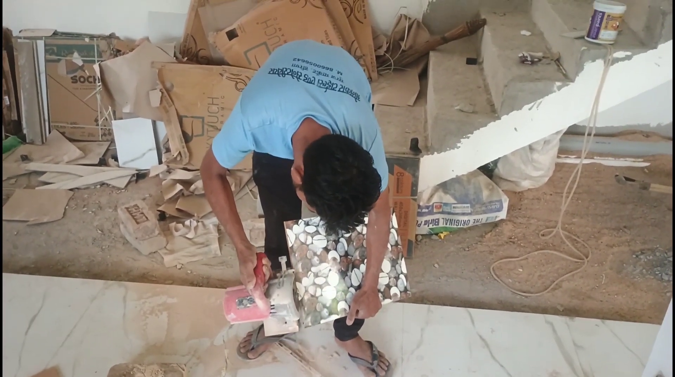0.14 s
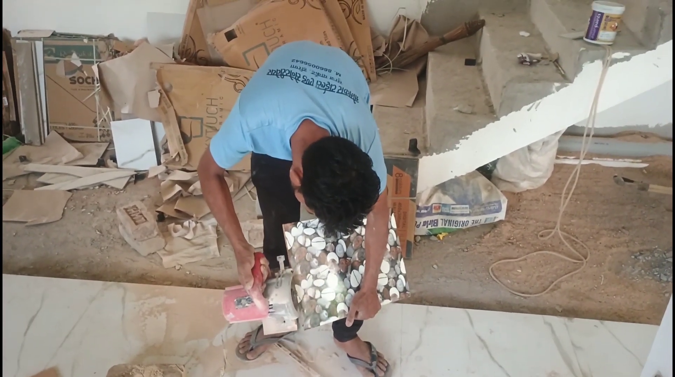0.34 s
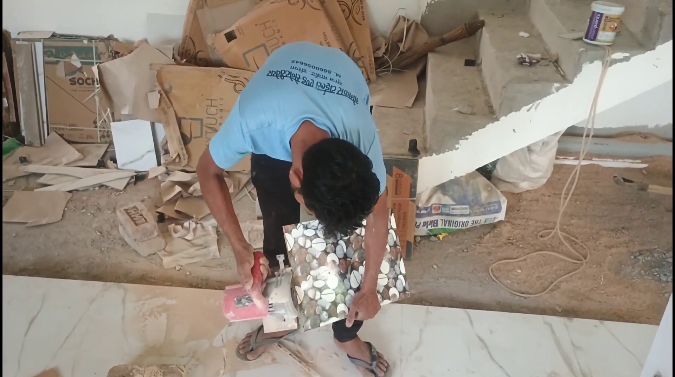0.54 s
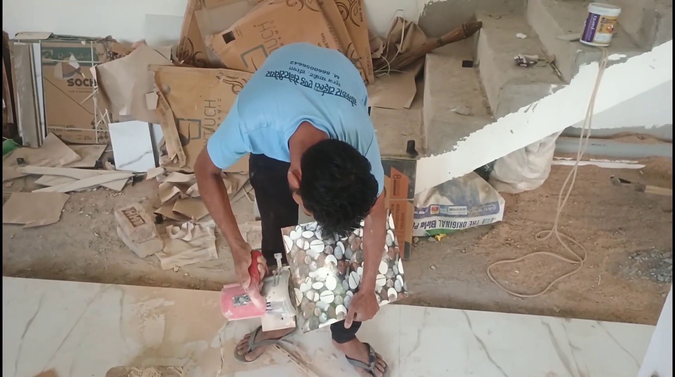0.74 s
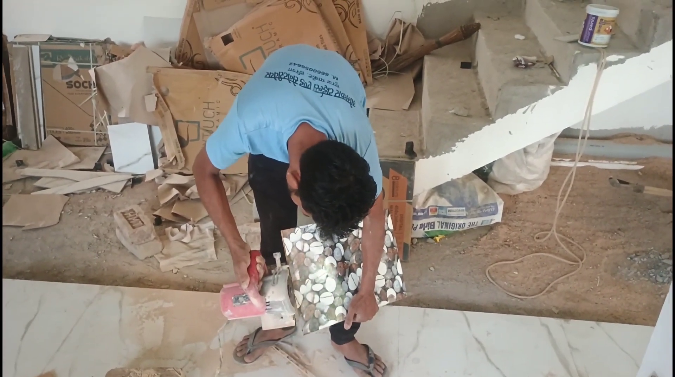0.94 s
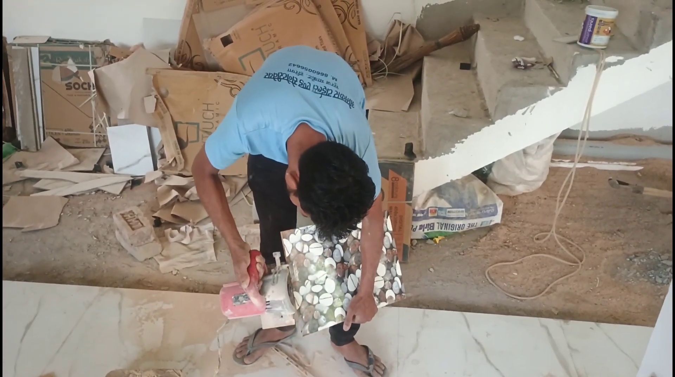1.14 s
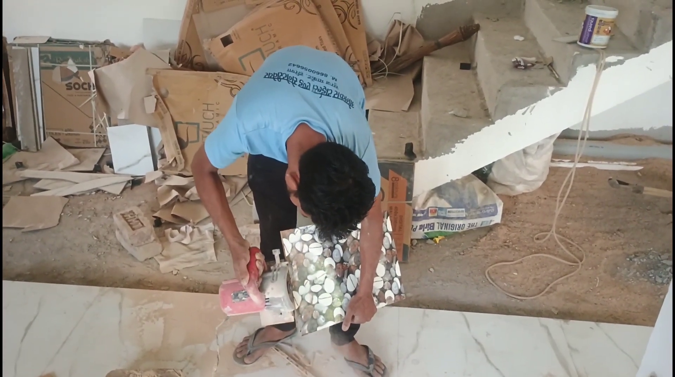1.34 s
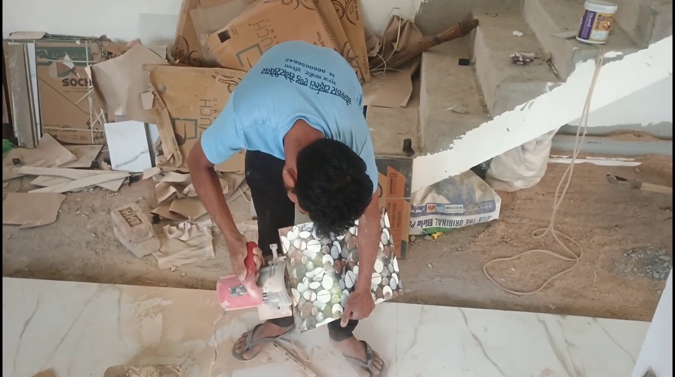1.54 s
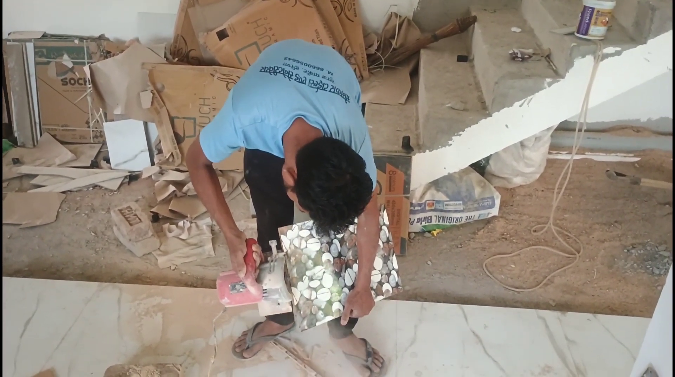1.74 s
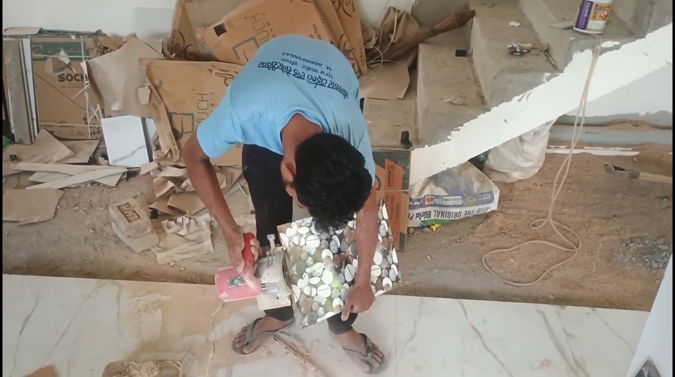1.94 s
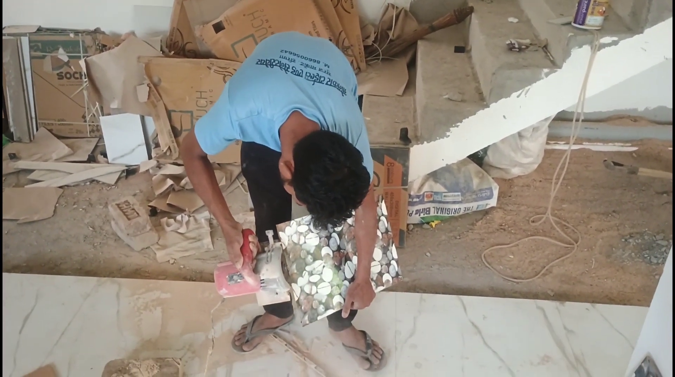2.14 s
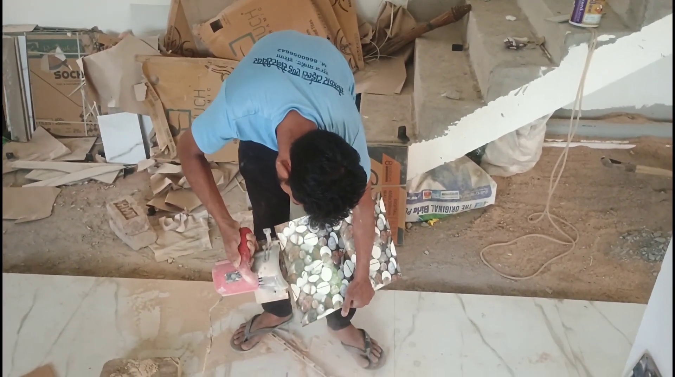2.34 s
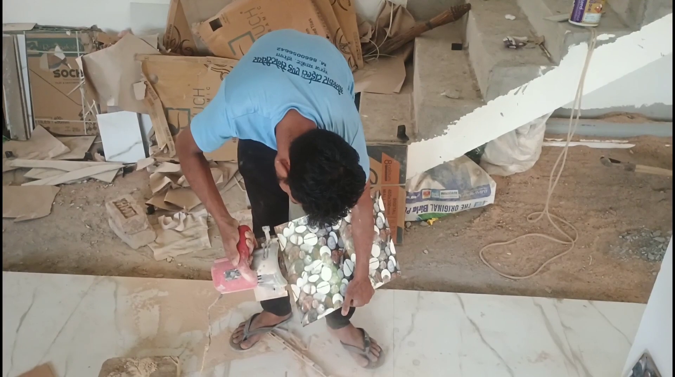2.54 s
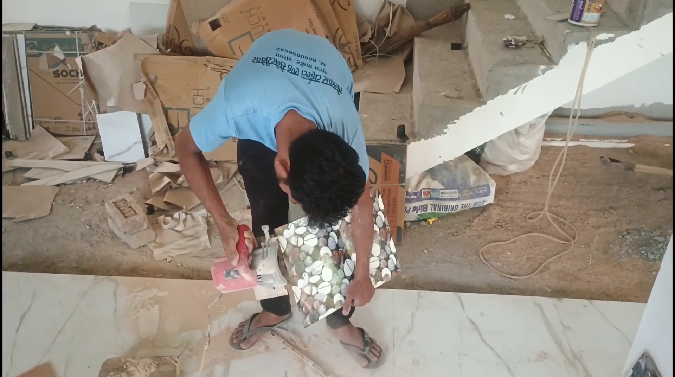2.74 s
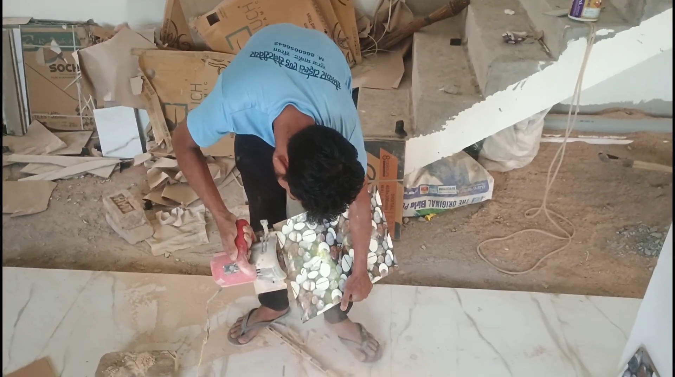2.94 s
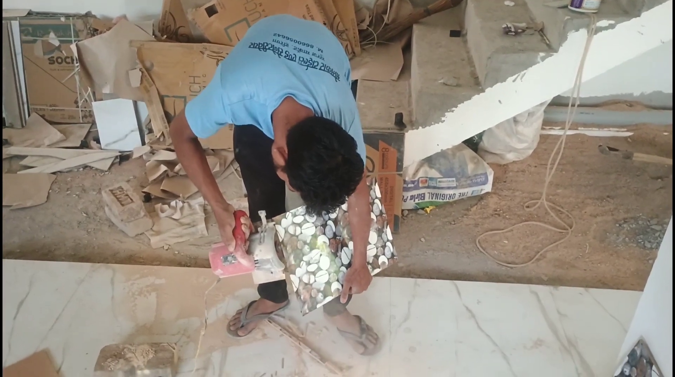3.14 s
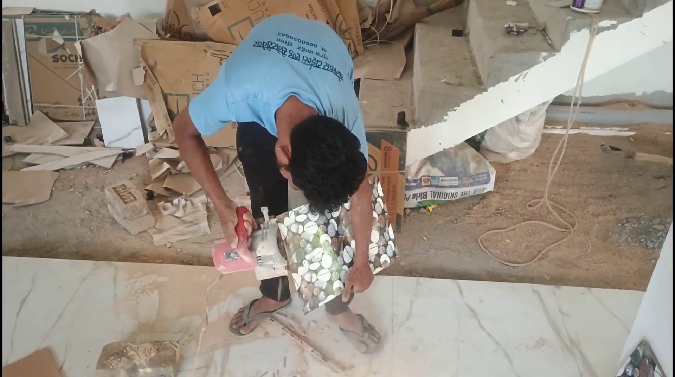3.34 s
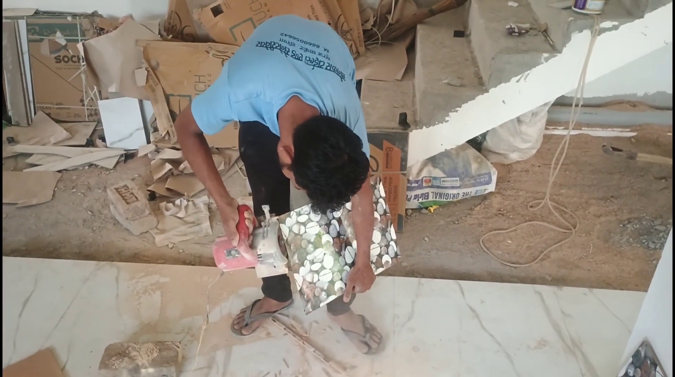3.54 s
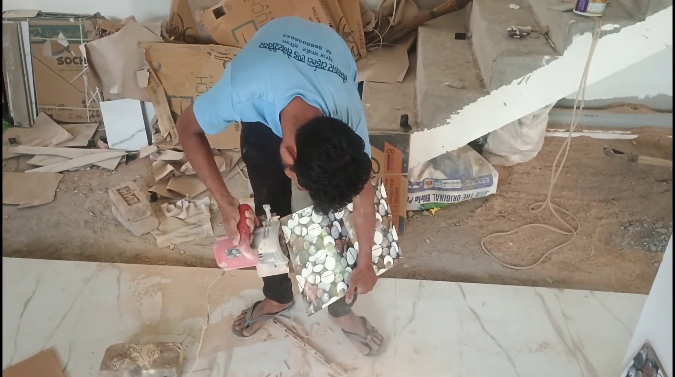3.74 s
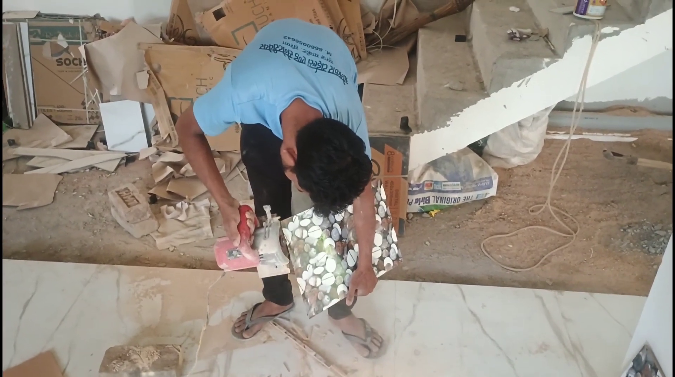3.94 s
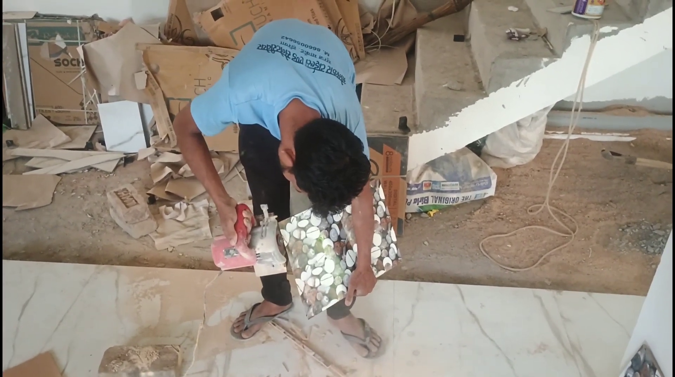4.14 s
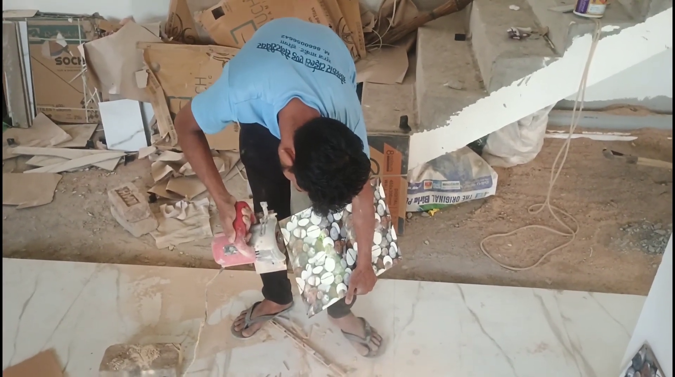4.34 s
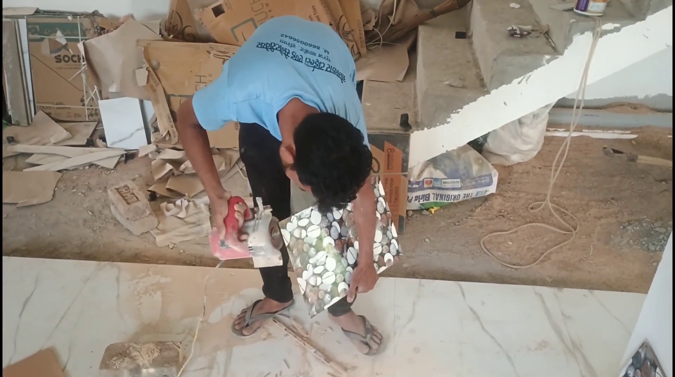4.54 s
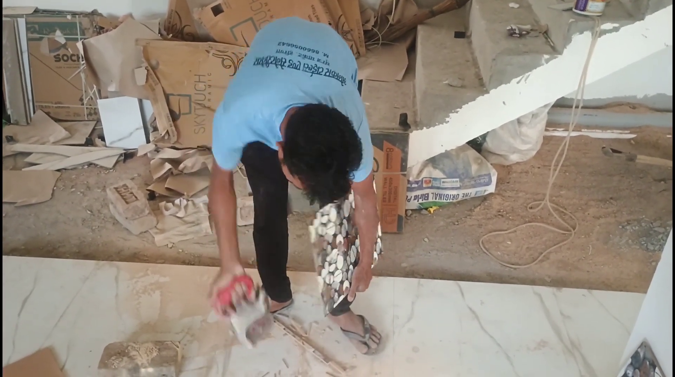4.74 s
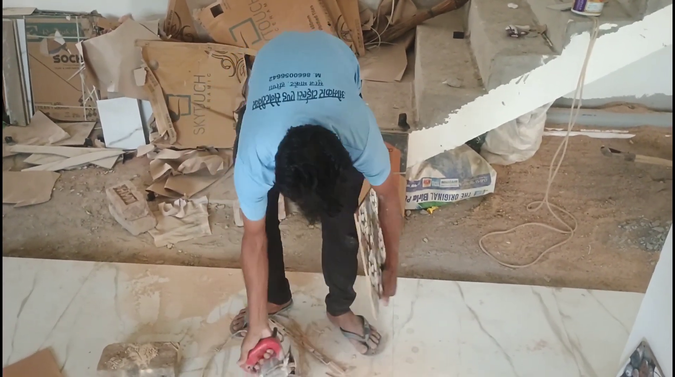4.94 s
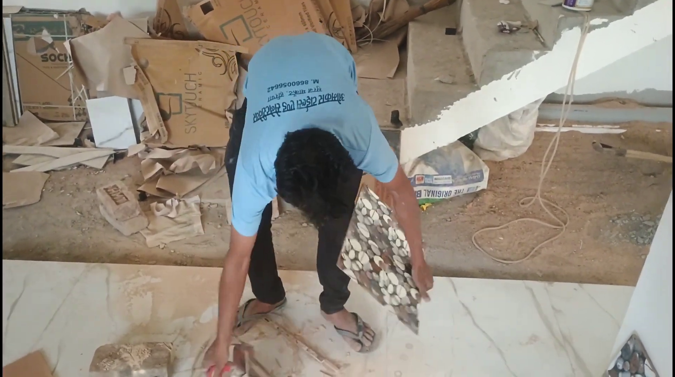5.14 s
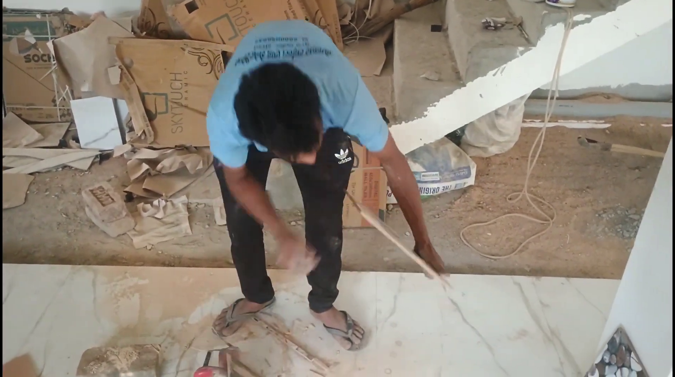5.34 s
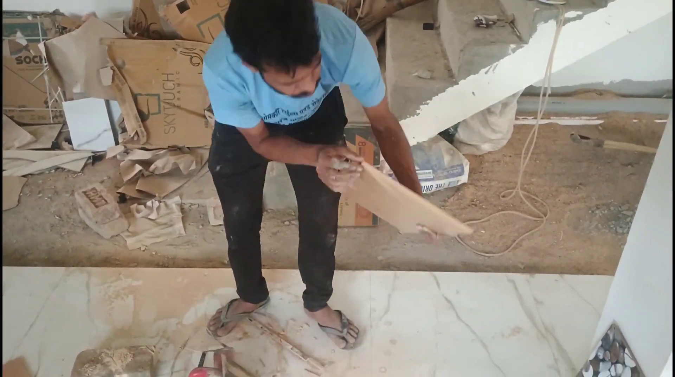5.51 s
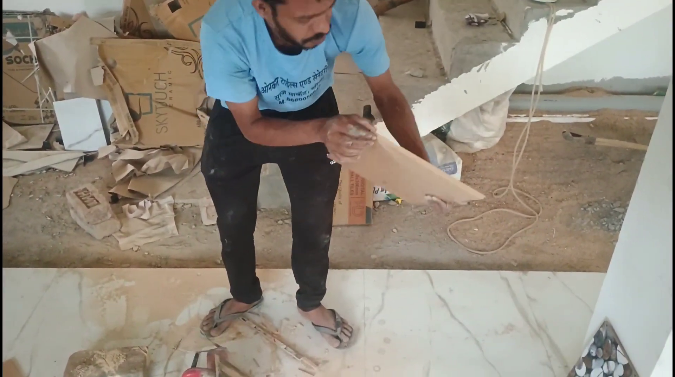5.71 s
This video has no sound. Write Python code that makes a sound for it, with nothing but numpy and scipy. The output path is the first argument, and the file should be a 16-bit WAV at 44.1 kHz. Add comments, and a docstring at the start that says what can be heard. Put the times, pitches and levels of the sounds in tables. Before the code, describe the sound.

Loud, bright tile grinding with a steady motor whine, then the freed blade coasts down, rushing and squealing, with small knocks on the floor.

```python
"""In a bare, hard room a handheld electric cutter grinds through a ceramic tile, is switched off and set down.
Random grit impacts ring resonances of blade and tile; sine tones for gears and rotor whine on top.
As the cutter coasts, the whine slides down while noise bands rush, scrape and squeal.
Decaying modes knock as the body meets the floor. Noise echoes make the room, and low noise lies beneath."""
import sys
import numpy as np
from scipy import signal
from scipy.fft import rfft, irfft, next_fast_len
from scipy.io import wavfile

SR = 44100
rng = np.random.default_rng(int(sys.argv[2]) if len(sys.argv) > 2 else 0)


def generate_wav(sig):
    """Save sig (samples, or channels by samples) to the path in sys.argv[1] as 16-bit PCM at SR."""
    pcm = np.round(np.clip(np.atleast_2d(sig).T, -1, 1) * 32767).astype(np.int16)
    wavfile.write(sys.argv[1], SR, pcm)


N = 258845
T = np.arange(N) / SR   # time in seconds
LOAD_OFF_S = 4.42       # the blade leaves the cut
SWITCH_OFF_S = 4.51
LEFT_RIGHT = np.array([[1], [-1]])


def amp(db):
    """Turns decibels into an amplitude factor."""
    return 10 ** (np.asarray(db) / 20)


def rms_one(x):
    """Scales a signal to an overall rms of 1."""
    return x / np.sqrt(np.mean(x ** 2) + 1e-20)


def in_time(rows):
    """Draws straight lines through time between the rows, one curve for each column after the seconds."""
    seconds, *columns = np.transpose(rows)
    return [np.interp(T, seconds, column) for column in columns]


def at_hz(points, hz):
    """Reads a curve over frequency, with straight lines on a logarithmic pitch scale."""
    points = np.array(points)
    return np.interp(np.log(hz + 1), np.log(points[:, 0]), points[:, 1])


def drift(rate_hz):
    """Slow random wandering with a spread of 1: smoothed noise made at every 40th sample."""
    step = 40
    r = np.exp(-2 * np.pi * step * rate_hz / SR)
    noise = rng.standard_normal(N // step + 2002)
    slow = signal.lfilter([1], [1, -2 * r, r * r], noise)[2000:]   # skip the filter's start
    return np.interp(np.arange(N) / step, np.arange(len(slow)), rms_one(slow))


def swell(at_s, lasts_s):
    """A flat-topped rise and fall that peaks at 1."""
    return np.exp(-((T - at_s) / lasts_s) ** 4)


def coloured(white, spectrum):
    """Filters white input to a given spectrum shape, then scales it to rms 1."""
    size = next_fast_len(N)
    gain = amp(at_hz(spectrum, np.fft.rfftfreq(size, 1 / SR)))
    return rms_one(irfft(rfft(white, size) * gain, size)[:N])


def resonance(x, hz, width_hz):
    """A two-pole filter that rings at one frequency; a narrower width rings longer."""
    r = np.exp(-np.pi * width_hz / SR)
    edge = (1 - r * r) / 2
    return signal.lfilter([edge, 0, -edge], [1, -2 * r * np.cos(2 * np.pi * hz / SR), r * r], x)


def narrow_noise(hz, width_hz):
    """A noise band with steep sides and rms 1: slow noise on a carrier whose pitch may glide."""
    r = np.exp(-np.pi * width_hz / SR)
    a, b = signal.lfilter([1], [1, -2 * r, r * r], rng.standard_normal((2, N)))
    phase = 2 * np.pi * np.cumsum(hz + np.zeros(N)) / SR
    return rms_one(a * np.cos(phase) + b * np.sin(phase))


# The cutting. Each row: time in seconds, level in dB, how far the ringing has shifted from 0 to 1.
GRINDING_LEVELS = [(0, -14.5, 0.45), (.3, -13.5, 0.56), (1.07, -13.5, 0.35), (1.5, -14, 0.39),
                   (2.1, -14, 0.76), (3.0, -14, 0.77), (4.41, -13.5, 0.83), (4.45, -15.5, 0.98),
                   (4.6, -17.5, 0.85), (4.8, -22.5, 0.8)]
# Colour of the grit impacts. Each row: frequency in Hz, relative level in dB per Hz.
GRIT_SPECTRUM = [(110, -70), (180, -40), (300, -30), (827, -17), (894, -15), (1090, -14.5), (1540, -17.5),
                 (2450, -11.5), (2650, -10.5), (3300, -6.5), (3750, -3.5), (4220, -0.5), (5130, -2),
                 (7710, -5.5), (10100, -3), (11400, -1.5), (15500, -7)]
# Ringing of blade and tile. Each row: frequency in Hz, width in Hz, gain in dB unshifted,
# gain in dB fully shifted.
BLADE_MODES = [(1710, 370, -5.5, 4), (2650, 100, -1.5, 2.5), (3080, 680, -43, 2.5), (4140, 270, -23, -6.5),
               (4630, 300, -2, -9), (5800, 590, -14, -9), (6900, 520, 12, -6), (7530, 230, -1, 4.5),
               (7900, 414, 1, 5.5), (9080, 370, 6.5, -2.5), (11390, 450, 2.5, -7.5), (11760, 45, -2, -15),
               (12000, 39, -1, -8), (13900, 98, 2, -10)]
RING_DAMPED_DB = -0.5   # the ringing drops once the load is off
WOBBLE_CUT = 0.023      # share by which the level swings once a blade turn


def grinding(wobble):
    """Dense grit impacts of uneven size ring the blade and tile; the ringing shifts as the cut advances."""
    level_db, shifted = in_time(GRINDING_LEVELS)
    shifted = np.clip(shifted, 0, 1)
    sizes = amp(3.36 * np.minimum(rng.exponential(1, N), 5)) * rng.choice([-1, 1], N)
    hits = rng.random(N) < .4   # chance of an impact at each sample
    grit = coloured(sizes * hits, GRIT_SPECTRUM)
    damped_db = RING_DAMPED_DB / (1 + np.exp((LOAD_OFF_S - T) / 0.034))
    out = grit.copy()
    for hz, width_hz, start_db, end_db in BLADE_MODES:
        gain_db = start_db + shifted * (end_db - start_db) + damped_db + 0.7 * drift(5.5)
        out += amp(gain_db) * resonance(grit, hz, width_hz)
    contact = 1 / (1 + np.exp((T - 4.7) / 0.067))   # fades out around 4.7 s
    return rms_one(out) * amp(level_db + 0.28 * drift(32)) * contact * (1 + WOBBLE_CUT * wobble)


# Speed under power, as the pitch of the gear whine. Each row: time in seconds, pitch in Hz.
POWERED_WHINE_PITCH = [(0, 894), (.5, 891.5), (1.25, 888), (1.65, 890), (1.95, 893), (2.15, 902),
                       (2.55, 897), (3.0, 899), (3.5, 903), (3.7, 911), (4.1, 914), (4.35, 917),
                       (4.51, 918)]
DRAG_S = 1.79


def speed():
    """Whine pitch through time in Hz; after switch-off, drag lowers it as 1 / (1 + time / DRAG_S) squared."""
    since_off = np.maximum(T - SWITCH_OFF_S, 0)
    return in_time(POWERED_WHINE_PITCH)[0] / (1 + since_off / DRAG_S) ** 2


def blade_wobble(whine_hz):
    """A sine swing once a blade turn, with twelve whine cycles to a turn."""
    return np.sin(2 * np.pi * np.cumsum(whine_hz / 12) / SR)


# Gear whine, faint once free and damped when the body meets the floor.
# Each row: time in seconds, rms level in dB.
WHINE_LEVELS = [(0, -38), (.3, -36.5), (1.0, -37.5), (1.25, -46), (1.42, -38), (2.0, -39.5), (3.4, -41),
                (3.65, -44), (3.71, -36), (4.48, -38), (4.56, -43), (4.63, -43), (4.7, -47), (5.0, -50),
                (5.12, -52), (5.18, -48), (5.3, -46), (5.34, -75)]
# Rotor tones, each loudest when the speed puts it on a resonance of the housing.
# Each row: multiple of the rotor rate, half the tone's height in dB, whine pitch in Hz where it is
# loudest, reach around that pitch in Hz.
ROTOR_ORDERS = [(1, -65, 899, 7), (3, -53, 900, 8), (4, -44.5, 910, 20), (43 / 9, -51, 900, 30),
                (5, -49, 891, 5), (7, -45, 900, 25), (8, -39, 891, 5), (9, -36.5, 913, 7),
                (11, -28, 913, 9.5), (13, -35, 891, 3), (14, -33, 914, 9), (15, -36, 898, 2.5),
                (16, -32, 914, 5), (18, -32, 902, 12), (20, -32, 902, 8), (21, -33, 912, 7),
                (22, -34, 913, 6), (32, -36, 913, 5)]
# Bursts in which one rotor tone flares up. Each row: loudest at in seconds, lasts in seconds, rms level in dB.
ROTOR_FLARES = [(.14, .03, -35), (.33, .03, -28), (.42, .02, -34), (.5, .03, -32), (.72, .03, -31),
                (.87, .04, -36), (.955, .025, -27), (2.72, .08, -36)]
FLARE_ORDER = 8   # the rotor multiple that flares
WHINE_PER_ROTOR = 43 / 18
WHINE_WAVER_DB, FREE_WAVER_DB, ORDER_WAVER_DB = 1.8, 3, 2   # random spread of the levels
SPEED_JITTER_HZ = 1.5   # small random speed jitter, in whine pitch, makes sharply tuned rotor tones flicker


def motor(whine_hz):
    """Gear whine and rotor tones follow the speed; the high rotor tones differ in phase between the ears."""
    turns = np.cumsum(whine_hz) / SR   # whine cycles so far
    load = 1 / (1 + np.exp((T - LOAD_OFF_S) / .04))   # rotor tones fade once the load is off
    waver_db = np.where(T < SWITCH_OFF_S, WHINE_WAVER_DB, FREE_WAVER_DB) * drift(21)
    whine_level = amp(in_time(WHINE_LEVELS)[0] + waver_db)
    out = np.sqrt(2) * whine_level * np.sin(2 * np.pi * turns) * np.ones((2, 1))
    jitter_hz = SPEED_JITTER_HZ * drift(12)   # acts on the levels of the rotor tones, not their pitch
    for multiple, db, best_hz, reach_hz in ROTOR_ORDERS:
        # a quarter cycle between the ears for the high tones
        ear_phase = np.pi / 2 * (multiple > 5) * np.array([[1], [0]])
        phase = rng.uniform(0, 2 * np.pi) + ear_phase
        housing = np.exp(-((whine_hz + jitter_hz - best_hz) / reach_hz) ** 2)
        size = housing * load * amp(db + ORDER_WAVER_DB * drift(5.7))
        if multiple == FLARE_ORDER:
            flares = sum(amp(flare_db) * swell(s, lasts_s) for s, lasts_s, flare_db in ROTOR_FLARES)
            size = size + flares / np.sqrt(2)
        out += 2 * size * np.sin(2 * np.pi * turns * multiple / WHINE_PER_ROTOR + phase)
    return out


# How alike the two ears are. Each row: frequency in Hz, direct share of the power from 0 to 1.
DIRECT_SHARE = [(150, 1), (300, 0.62), (600, 0.79), (1000, 0.54), (1900, 0.63), (2500, 0.017),
                (15000, 0.0043)]
# Difference in colour between the two microphones. Each row: frequency in Hz, left minus right in dB.
EAR_BALANCE = [(60, 2.0), (110, 0), (200, -0.5), (380, 0), (700, -1), (1290, 0.5), (2380, -0.5),
               (4400, -1.5), (8120, 1.5), (15000, -1)]
ROOM_T60_S = .33          # time for the echoes to fall by 60 dB
RIGHT_LAG_S = 2 / 44100   # the direct sound reaches the right ear later


def room(x, count=84):
    """Direct sound plus decaying noise echoes, unlike in each ear, that change as the tool moves along."""
    lead = SR // 3
    x = np.concatenate([x[lead:0:-1], x])   # a reversed lead-in: the room already rings at the start
    hop = len(x) // count + 1
    size = next_fast_len(2 * hop + lead)
    hz = np.fft.rfftfreq(size, 1 / SR)
    direct = np.clip(at_hz(DIRECT_SHARE, hz), 0, 1)
    ears = amp(at_hz(EAR_BALANCE, hz) * .5 * LEFT_RIGHT) * np.sqrt(2 / (1 + direct))
    lag = np.exp(-2j * np.pi * hz * RIGHT_LAG_S * np.array([[0], [1]]))
    x = np.pad(x, (hop, 2 * hop))
    fade = np.sqrt(np.bartlett(2 * hop))
    tail = amp(-60 * T[:lead] / ROOM_T60_S)
    out = np.zeros((2, len(x) + size))
    for start in range(0, len(x) - 2 * hop, hop):   # overlapping pieces, each with fresh echoes
        echoes = rng.standard_normal((2, lead)) * tail / np.sqrt(np.sum(tail ** 2))
        path = (np.sqrt(direct) * lag + np.sqrt(1 - direct) * rfft(echoes, size)) * ears
        piece = x[start:start + 2 * hop] * fade
        out[:, start:start + size] += irfft(rfft(piece, size) * path, size)
    return out[:, hop + lead:hop + lead + N]


# Low noise, unlike in each ear. Each row: time in seconds, level in dB before wavering, gaps and ear difference.
RUMBLE_LEVELS = [(0, -60.5), (1.6, -56.5), (2.2, -64), (4.25, -63.5), (4.5, -76), (4.86, -81), (5.87, -76)]
RUMBLE_WAVER_DB, RUMBLE_GAP_DB = 1.5, 6.5   # strength of the slow wavering and of the quick drops


def rumble():
    """Separate low noise on each microphone wavers slowly and drops out in quick random gaps."""
    band = signal.butter(2, [25, 200], "band", fs=SR, output="sos")
    low = signal.sosfilt(band, rng.standard_normal((2, N)))
    waver_db = RUMBLE_WAVER_DB * drift(1.5)
    gaps_db = RUMBLE_GAP_DB * np.minimum(drift(9), .6)   # rises are capped, drops are not
    return rms_one(low) * amp(in_time(RUMBLE_LEVELS)[0] + waver_db + gaps_db + 1.2 * LEFT_RIGHT)


# Coasting. Each row: time in seconds, rush level in dB, scrape level in dB, squeal level in dB.
COASTING_LEVELS = [(4.6, -13.5, -21, -41), (4.72, -19, -30, -30), (4.856, -17.5, -29.5, -29),
                   (4.95, -18.5, -30.5, -29), (5.07, -18.5, -27, -23), (5.3, -19, -26.5, -28.5),
                   (5.44, -23.5, -30.5, -22), (5.56, -22, -30.5, -24), (5.7, -21, -30.5, -34),
                   (5.87, -23, -32.5, -34)]
# Colour of the rush of air and bearings. Each row: frequency in Hz, relative level in dB per Hz.
RUSH_SPECTRUM = [(900, -55), (2300, -18), (2900, -7), (4600, -2), (6300, -4), (7700, -4), (9500, -5.5),
                 (10500, -6), (13300, -6), (15500, -22)]
# Colour of the scraping guard. Each row: frequency in Hz, relative level in dB per Hz.
SCRAPE_SPECTRUM = [(100, -59), (200, -29), (445, -16.5), (900, -4.5), (1300, -2.5), (1850, -2.5), (2400, 0),
                   (3200, -4), (6000, -19)]
# Modes of the free blade; the lower ones take over as it slows.
# Each row: frequency in Hz, width in Hz, relative level in dB at switch-off, relative level in dB at the end.
SQUEAL_MODES = [(7400, 200, -3, -20), (7254, 30, -5, -3), (7170, 90, -2, -9), (7080, 110, -14, -2),
                (6930, 70, -10, -3), (6850, 60, -9, -9)]
# Rings that come and go as the blade slows.
# Each row: loudest at in seconds, lasts in seconds, frequency in Hz, width in Hz, level in dB.
PASSING_RINGS = [(5.05, .05, 4700, 500, -31), (5.21, .1, 8840, 50, -35), (5.27, .08, 8600, 60, -36),
                 (5.71, .15, 5200, 550, -26.5), (5.79, .08, 5700, 600, -30), (5.265, .045, 930, 200, -42),
                 (5.04, .035, 1800, 250, -36)]
# Moments when the level dips briefly. Each row: time in seconds, change in dB.
LEVEL_DIPS = [(5.112, -5), (5.172, -6), (5.274, -2), (5.36, -2), (5.66, -3), (5.765, -1)]
DIP_S, SQUEAL_FLICKER_DB = 0.02, 2.5
WOBBLE_FREE = 0.13   # share by which the level swings once a blade turn
# a breathy band slides down with the speed, at a multiple of the whine pitch
GLIDE_PER_WHINE, GLIDE_AT_S, GLIDE_LASTS_S = 18, 5.18, .22
GLIDE_WIDTH_HZ, GLIDE_DB = 1500, -27.5


def coasting(whine_hz, wobble):
    """Air and bearings rush, the guard scrapes, the free blade squeals, and all throb once a turn."""
    rush_db, scrape_db, squeal_db = in_time(COASTING_LEVELS)
    free = 1 / (1 + np.exp((4.7 - T) / 0.079))   # fades in around 4.7 s
    rush = amp(rush_db) * coloured(rng.standard_normal(N), RUSH_SPECTRUM)
    scrape = amp(scrape_db) * coloured(rng.standard_normal(N), SCRAPE_SPECTRUM)
    slowed = np.clip((T - SWITCH_OFF_S) / (T[-1] - SWITCH_OFF_S), 0, 1)
    squeal = np.zeros(N)
    for hz, width_hz, start_db, end_db in SQUEAL_MODES:
        mode_db = start_db + slowed * (end_db - start_db) + SQUEAL_FLICKER_DB * drift(9.4)
        squeal += amp(mode_db) * narrow_noise(hz, width_hz)
    rings = np.zeros(N)
    for at_s, lasts_s, hz, width_hz, db in PASSING_RINGS:
        rings += amp(db) * swell(at_s, lasts_s) * narrow_noise(hz, width_hz)
    glide_band = narrow_noise(GLIDE_PER_WHINE * whine_hz, GLIDE_WIDTH_HZ)
    glide = amp(GLIDE_DB) * swell(GLIDE_AT_S, GLIDE_LASTS_S) * glide_band
    dips_db = sum(db * np.exp(-((T - s) / DIP_S) ** 2) for s, db in LEVEL_DIPS)
    throb = 1 + WOBBLE_FREE * wobble
    return free * amp(dips_db) * throb * (rush + scrape + rings + glide + amp(squeal_db) * squeal)


# The body touching the floor. Each row: time in seconds, relative strength in dB.
FLOOR_TOUCHES = [(5.034, -33), (5.05, -38), (5.068, -27), (5.255, -46), (5.311, -21.5), (5.317, -33),
                 (5.343, -27), (5.384, -39), (5.437, -50), (5.817, -40)]
# Modes of the body. Each row: frequency in Hz, relative level in dB, time to fall by 60 dB in seconds.
BODY_MODES = [(175, -3, .07), (217, 5, 0.1), (282, 1, 0.09), (345, 4, 0.08), (480, 13, 0.045),
              (675, 8, .04), (880, 11, .04)]
CONTACT_HZ = 450   # softness of the knocks: a lower value is duller


def knocks():
    """Each touch strikes every decaying mode of the body with a strength of its own."""
    at = [round(s * SR) for s, db in FLOOR_TOUCHES]
    touch_db = np.array(FLOOR_TOUCHES)[:, 1]
    out = np.zeros(N)
    for k, (hz, level_db, t60_s) in enumerate(BODY_MODES):
        clicks = np.full(N, 1e-18)   # a trace above zero keeps the filter fast
        clicks[at] = amp(touch_db + level_db - 11.5 + 2 * rng.standard_normal(len(at)))
        r = amp(-60 / (t60_s * SR))
        w = 2 * np.pi * hz / SR
        ringing = signal.lfilter([0, np.sin(w)], [1, -2 * r * np.cos(w), r * r], clicks)
        out += (-1) ** k * ringing   # neighbouring modes start in opposite directions
    soft = np.exp(-2 * np.pi * CONTACT_HZ / SR)
    out = signal.lfilter([(1 - soft) ** 2], [1, -2 * soft, soft ** 2], out)
    # a small body radiates no deep bass
    return signal.sosfilt(signal.butter(5, 165, "high", fs=SR, output="sos"), out)


# Lean of the tool's sound to one side. Each row: time in seconds, left minus right in dB.
SIDE_LEAN = [(0, -.1), (3.5, .3), (4.6, .2), (5.2, 1.8), (5.87, .6)]
KNOCK_ROOM_DB = -9   # knocks are near the floor and mostly direct


def scene():
    """Cutting, coasting and some of the knocks pass through the room; motor and direct knocks are added."""
    whine_hz = speed()
    wobble = blade_wobble(whine_hz)
    body = knocks()
    into_room = grinding(wobble) + coasting(whine_hz, wobble) + amp(KNOCK_ROOM_DB) * body
    tool = room(into_room) + motor(whine_hz) + .5 * body
    return tool * amp(in_time(SIDE_LEAN)[0] * .5 * LEFT_RIGHT)


CUTOFF_HZ = 15900


def record(dry):
    """Low noise joins at the microphones, the top is cut steeply and peaks beyond full scale are clipped."""
    cut = signal.cheby2(30, 70, CUTOFF_HZ, fs=SR, output="sos")
    return np.clip(signal.sosfilt(cut, dry + rumble()), -1, 1)


dry = scene()
out = record(dry)
generate_wav(out)
```